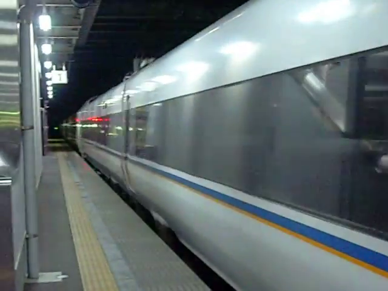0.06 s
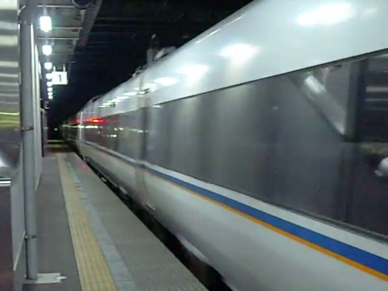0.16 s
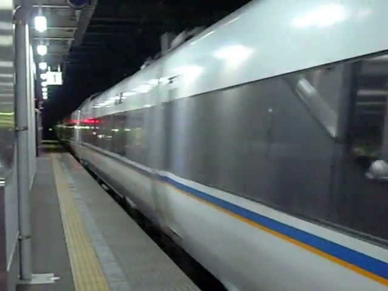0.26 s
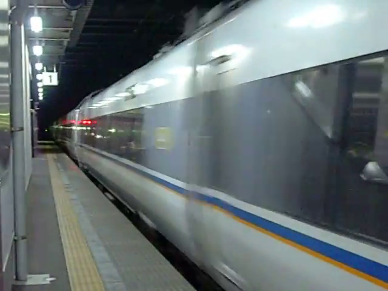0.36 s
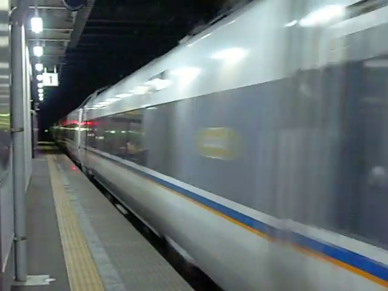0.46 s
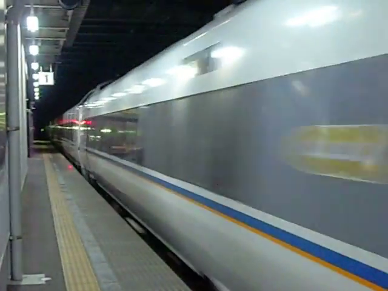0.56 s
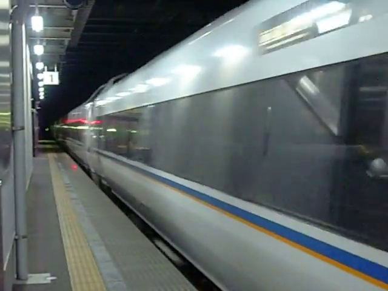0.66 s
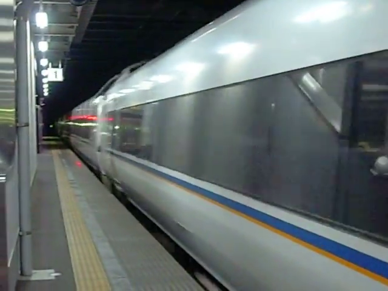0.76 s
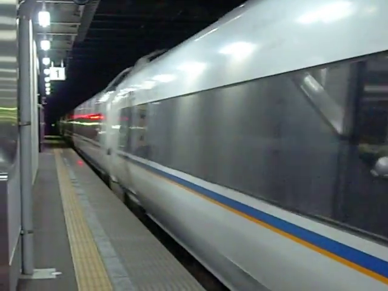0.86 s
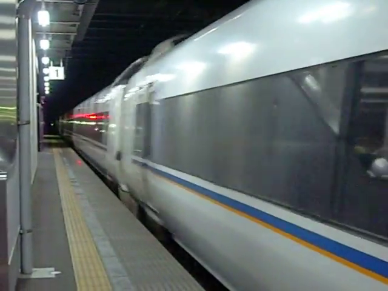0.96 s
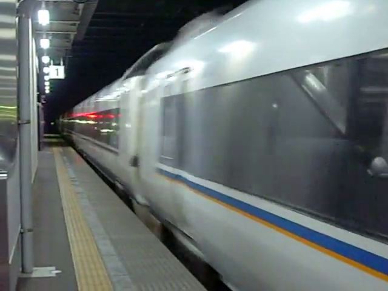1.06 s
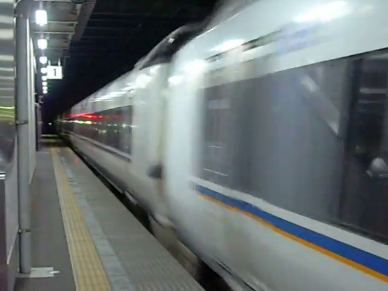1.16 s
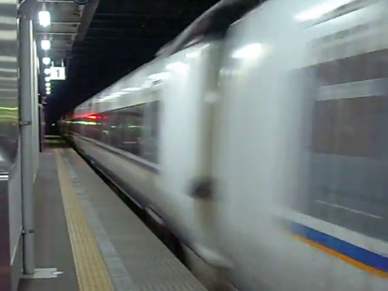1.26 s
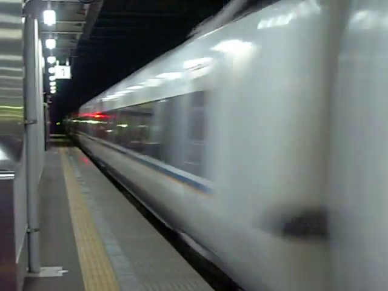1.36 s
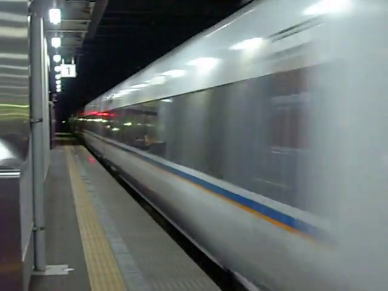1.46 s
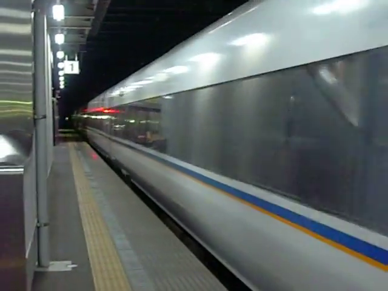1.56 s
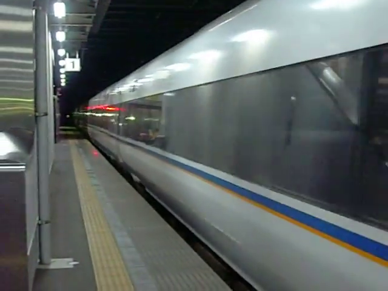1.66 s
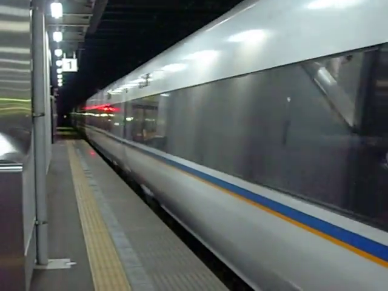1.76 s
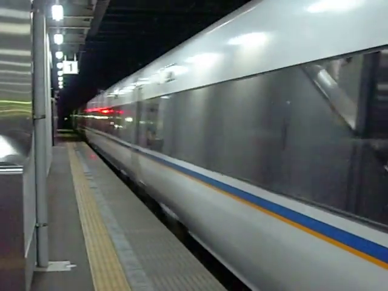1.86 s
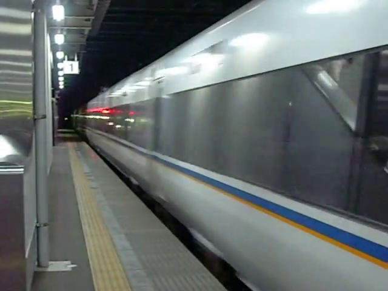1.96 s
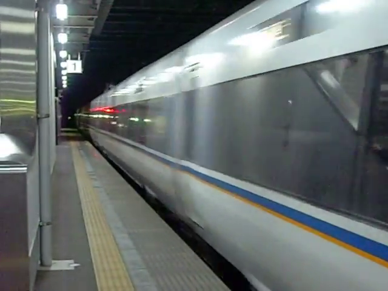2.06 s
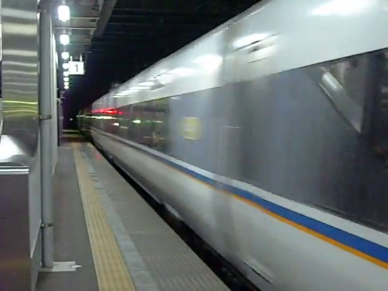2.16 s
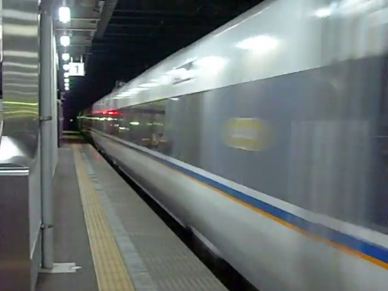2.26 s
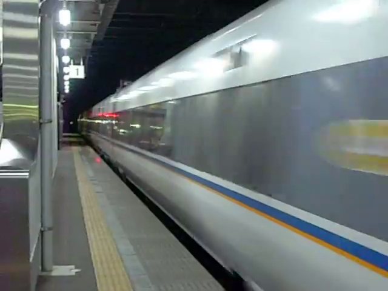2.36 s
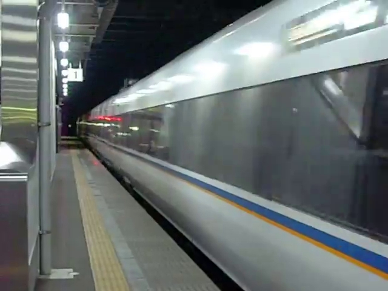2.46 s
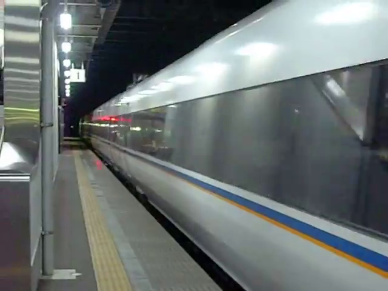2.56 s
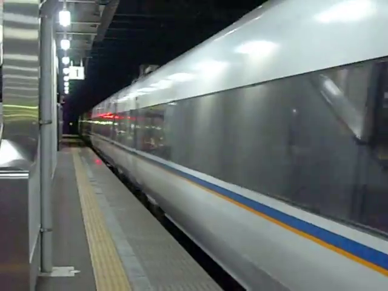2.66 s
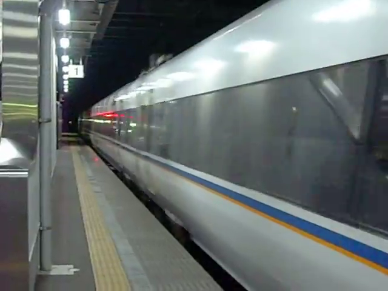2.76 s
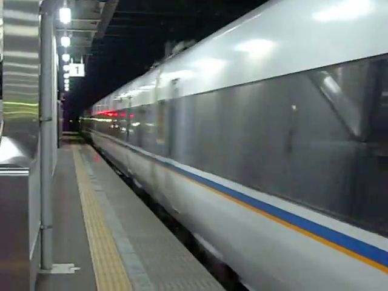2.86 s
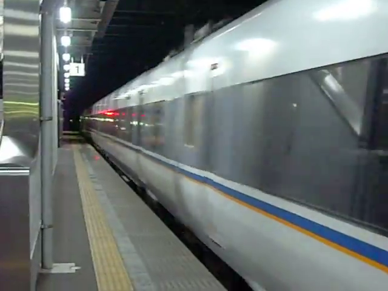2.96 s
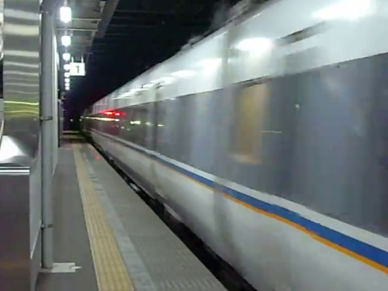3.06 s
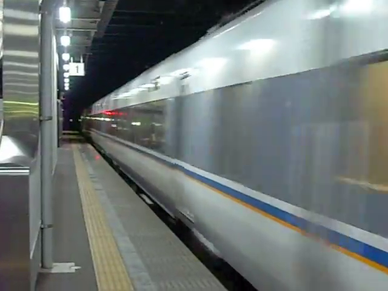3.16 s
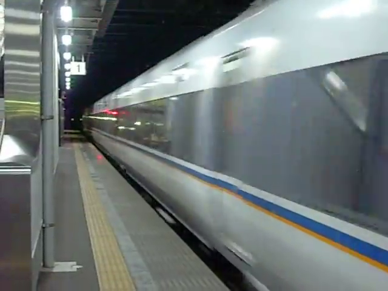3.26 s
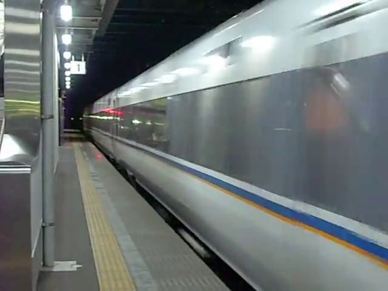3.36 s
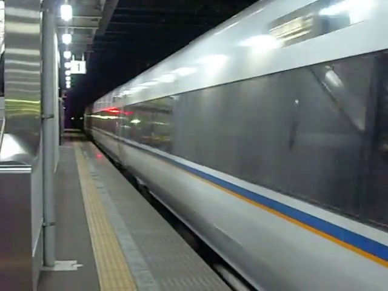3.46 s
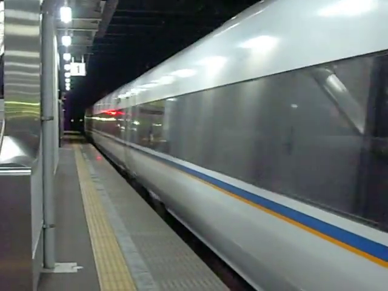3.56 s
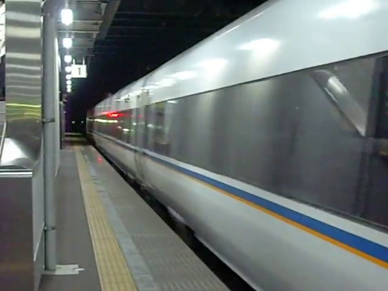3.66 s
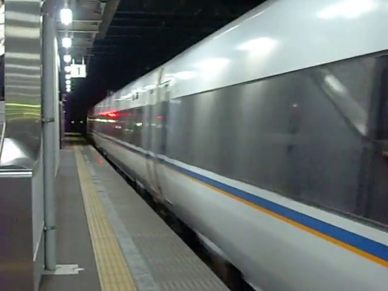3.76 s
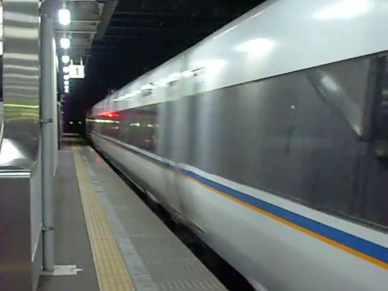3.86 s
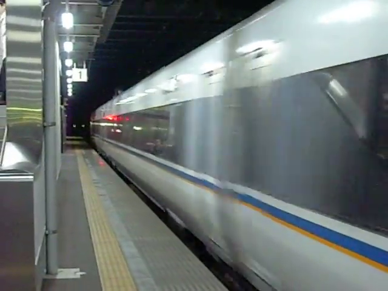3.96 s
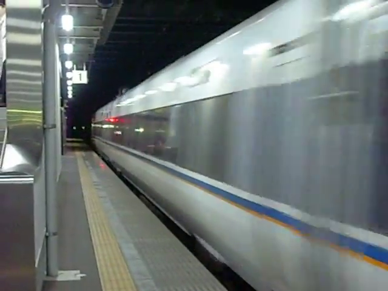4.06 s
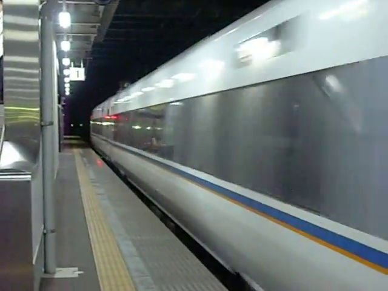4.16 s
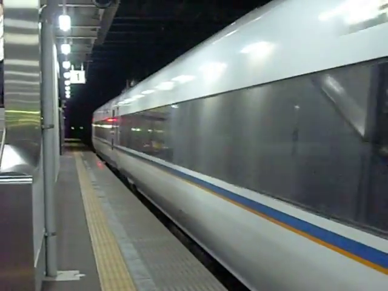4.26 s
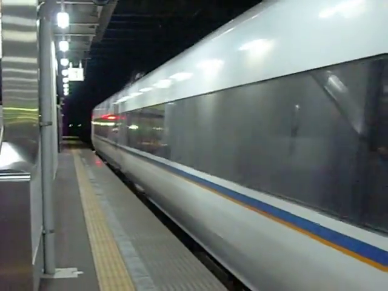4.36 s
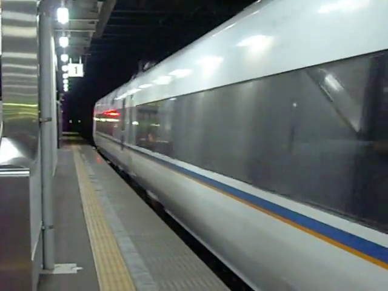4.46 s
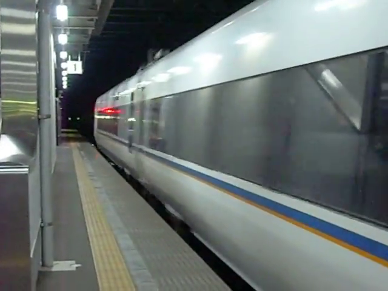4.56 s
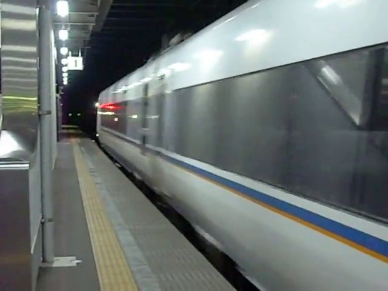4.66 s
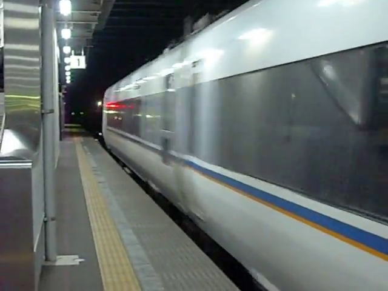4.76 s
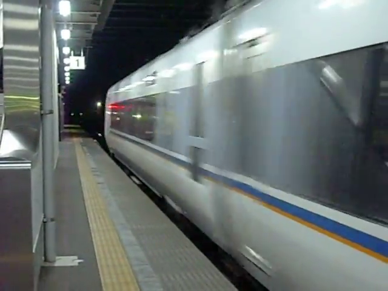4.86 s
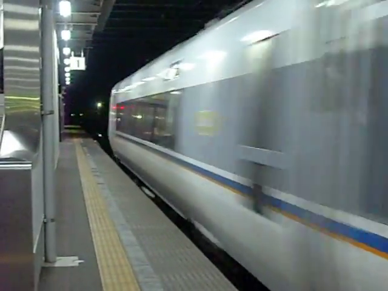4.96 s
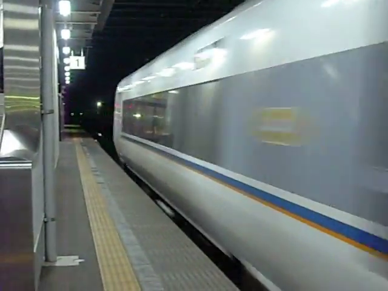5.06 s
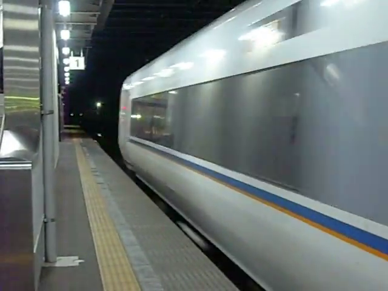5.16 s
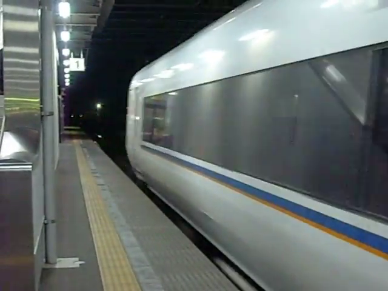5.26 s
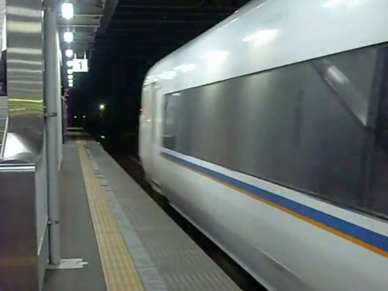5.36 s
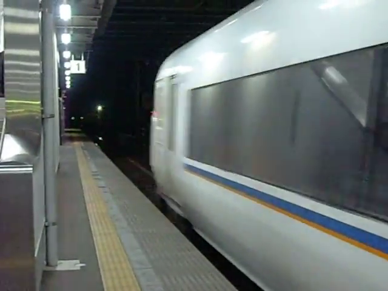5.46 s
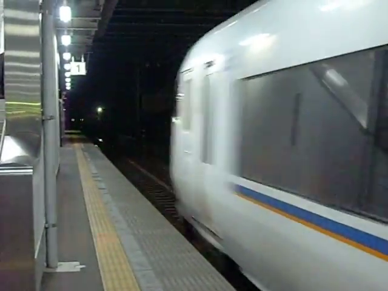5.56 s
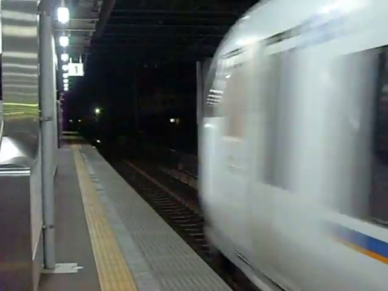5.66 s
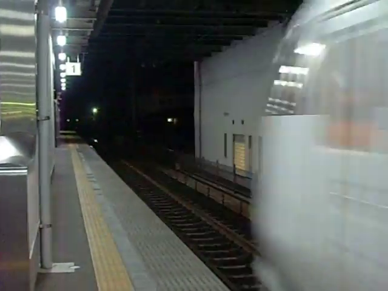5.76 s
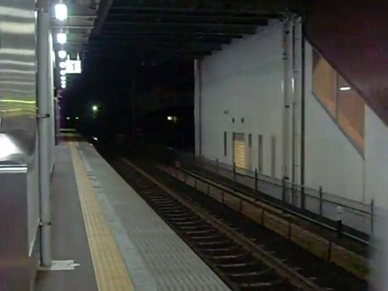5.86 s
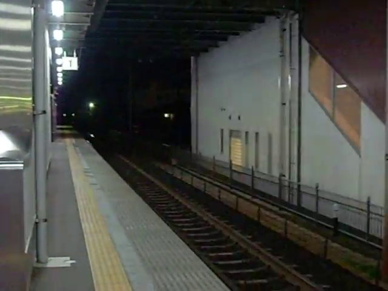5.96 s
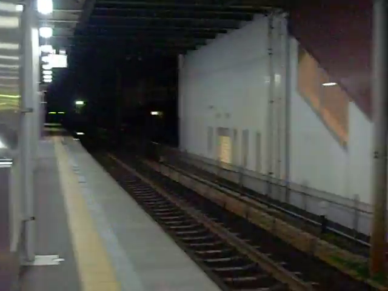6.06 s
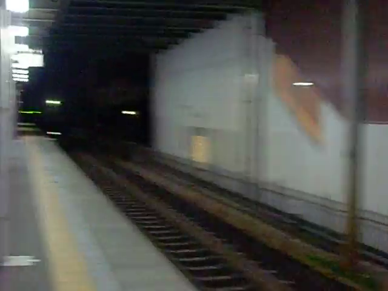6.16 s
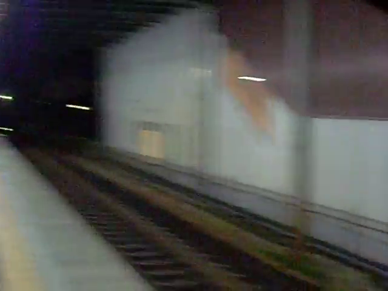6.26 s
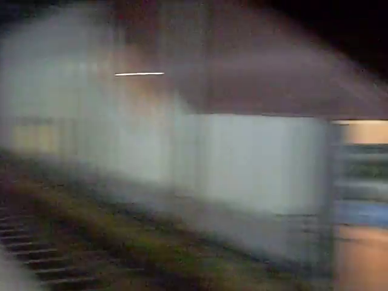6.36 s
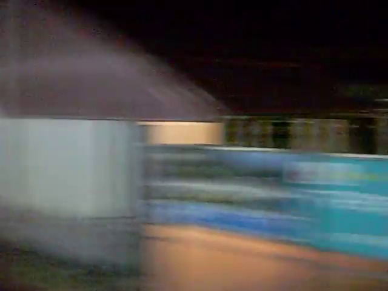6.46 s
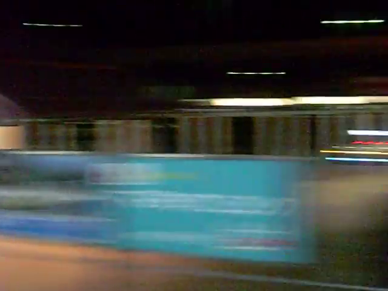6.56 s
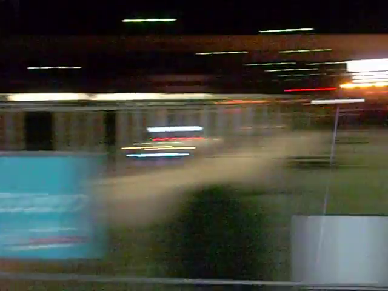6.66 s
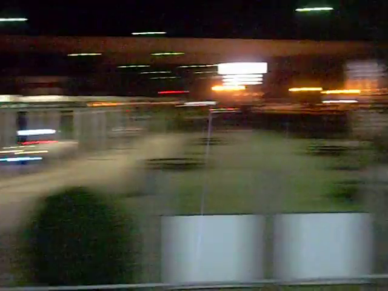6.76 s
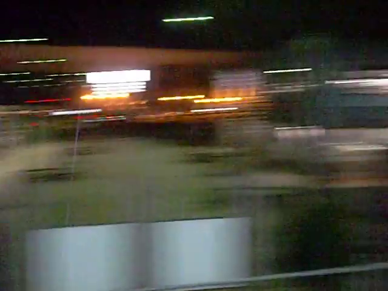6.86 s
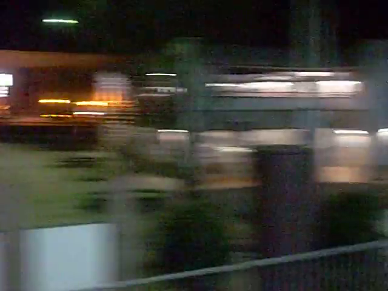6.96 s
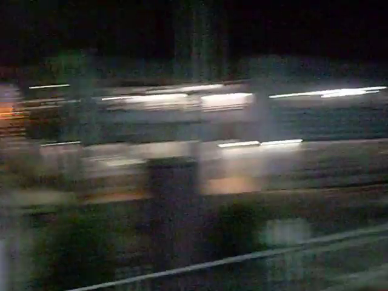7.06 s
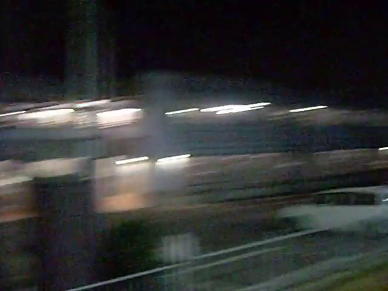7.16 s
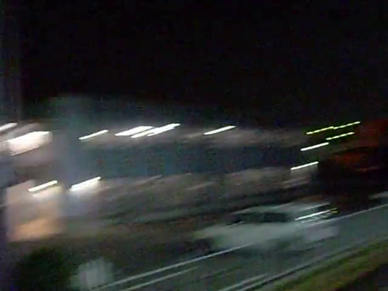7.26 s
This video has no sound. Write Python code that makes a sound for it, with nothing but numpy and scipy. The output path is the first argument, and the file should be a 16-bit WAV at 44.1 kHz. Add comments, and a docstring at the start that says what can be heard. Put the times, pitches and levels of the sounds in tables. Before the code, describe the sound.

An electric train roars past very close at speed, wheels ringing and hissing, then its wake buffets the microphone in hard gusts.

```python
"""Wheels roar on the rail as an electric train runs through a station at speed, an arm's length from
the microphone on the platform. The steel rings and hisses, swelling with each bogie, and some wheels
sing, falling in pitch as they pass. The slipstream flutters on the microphone; behind the last car
the wake strikes in hard gusts that overload the recorder, while the train recedes."""
import sys
import numpy as np
from scipy import signal
from scipy.fft import rfft, irfft, next_fast_len
from scipy.io import wavfile
from scipy.ndimage import uniform_filter1d, map_coordinates

SR = 44100
rng = np.random.default_rng(int(sys.argv[2]) if len(sys.argv) > 2 else 0)


def dump(signal):
    """Clip the signal to [-1, 1] and save it as 16-bit WAV at the path in sys.argv[1]."""
    limited = np.clip(np.atleast_2d(signal).T, -1, 1)
    pcm = np.round(limited * 32767).astype(np.int16)
    wavfile.write(sys.argv[1], SR, pcm)


N = 321930
TIME_S = np.arange(N) / SR


def amp(db):
    """Decibels to gain."""
    return 10 ** (np.asarray(db) / 20)


def unit(x):
    """Scale to rms 1."""
    return x / np.sqrt(np.mean(x ** 2) + 1e-20)


def shape(points):
    """Gain as a function of frequency, from (freq_hz, level_db) points on a log axis."""
    freq_hz, db = np.transpose(points)
    return lambda hz: amp(np.interp(np.log(hz + 1), np.log(freq_hz + 1), db))


def resonances(modes):
    """Gain as a function of frequency, from overlapping (centre_hz, width_hz, level_db) resonances."""
    return lambda hz: np.sqrt(sum(amp(db) ** 2 / (1 + ((hz - centre) / width) ** 2 / 2) ** 4
                                  for centre, width, db in modes))


def wobble(rate_hz):
    """A smooth random curve with rate_hz knots a second."""
    return map_coordinates(rng.standard_normal(N // 20), [TIME_S * rate_hz], mode="wrap")


def filtered(x, response):
    """Filter x by a gain given as a function of frequency."""
    size = next_fast_len(len(x) + 8192)
    return irfft(rfft(x, size) * response(np.fft.rfftfreq(size, 1 / SR)), size)[:len(x)]


def rush(response, patchy_db):
    """Coloured noise of rms 1 with patches of random gain in time and frequency."""
    spectra = signal.stft(rng.standard_normal(N), nperseg=512)[2]
    patches = uniform_filter1d(rng.standard_normal(spectra.shape), size=4, axis=0)
    patches = uniform_filter1d(patches, size=14, axis=1)
    noise = signal.istft(spectra * amp(patchy_db * unit(patches)))[1][:N]
    return unit(filtered(noise, response))


def swell(nearest_s, rise_s, fall_ratio=0.61):
    """Power of a source passing the microphone: 1 when nearest, falling faster than it rose."""
    t = TIME_S - nearest_s
    return np.exp(-(t / np.where(t < 0, rise_s, fall_ratio * rise_s)) ** 2)


# Bogies passing at arm's length: nearest_s, roar_db, ring_db, hiss_db, draught_db
BOGIES = [(-0.1, -29, -28, -28.5, -27.5), (0.38, -25.5, -34.5, -29, -35.5), (0.74, -26, -31, -24.5, -31),
          (1.38, -28, -35.5, -28.5, -46), (1.62, -23.5, -32, -29.5, -44), (2.29, -24, -37.5, -26, -30.5),
          (2.6, -27, -32, -26.5, -48), (3.11, -25, -30, -26, -30), (3.44, -25, -29, -26, -27.5),
          (4.041, -26, -38.5, -28.5, -30.5), (4.3, -23, -33, -29.5, -33.5), (4.95, -25, -37, -29, -25.5),
          (5.23, -28, -30.5, -26, -30.5), (5.889, -27, -35.5, -29.5, -47)]
def passing(layer, rise_s, rest_db, fade_db_per_s, last_car_s=5.8):
    """Gain of one layer: a swell per bogie over the rest of the train, which fades after the last car."""
    column = 1 + ["roar", "ring", "hiss", "draught"].index(layer)
    near_power = sum(amp(bogie[column]) ** 2 * swell(bogie[0], rise_s) for bogie in BOGIES)
    gone_s = np.maximum(TIME_S - last_car_s, 0)
    return np.sqrt(near_power + amp(rest_db - fade_db_per_s * gone_s) ** 2)


# Spectrum of the wind on the microphone: freq_hz, level_db
WIND_SPECTRUM = [(8, 1.5), (25, -0.5), (45, -6), (80, -5), (160, -6), (350, -8.5), (700, -16),
                 (1400, -26.5), (4000, -55.5)]
# Buffeting on the platform behind the last car: time_s, level_db
WAKE = [(6.05, -41), (6.184, -28), (6.286, -25), (6.564, -20), (7.006, -44), (7.048, -32), (7.146, -37.5),
        (7.174, -52), (7.3, -16.5)]
def slipstream(wake_rise_s=0.12):
    """Turbulent air rumbles on the microphone in quick lumps: a draught from each bogie, then the wake."""
    draught = passing("draught", rise_s=0.29, rest_db=-38, fade_db_per_s=11)
    wake_s, wake_db = np.transpose(WAKE)
    arrived = np.clip((TIME_S - wake_s[0]) / wake_rise_s + 1, 0, 1)
    wake = arrived * amp(np.interp(TIME_S, wake_s, wake_db))
    lumps = amp(3.2 * wobble(rate_hz=30) + 1.4 * wobble(rate_hz=110))
    return np.hypot(draught, wake) * unit(lumps * rush(shape(WIND_SPECTRUM), patchy_db=2.24))


# Eddies striking the microphone: middle_s, length_s, level_db (before trim), edge_hz (before ratio)
EDDIES = [(0.043, 0.0075, -18.5, 585), (0.516, 0.029, -24, 634), (0.635, 0.021, -28, 800),
          (1.062, 0.074, -29, 410), (3.051, 0.017, -23, 600), (3.365, 0.011, -17.5, 924),
          (3.411, 0.031, -22.5, 770), (3.697, 0.043, -23, 438), (4.213, 0.018, -18, 600),
          (4.357, 0.048, -24, 763), (4.72, 0.028, -24, 690), (4.928, 0.0066, -14.5, 880),
          (4.988, 0.015, -22, 800), (5.043, 0.012, -17.5, 483), (5.171, 0.012, -19, 650),
          (6.155, 0.054, -19.5, 342), (6.171, 0.011, -13, 1150), (6.193, 0.013, -14.5, 810),
          (6.217, 0.0078, -17, 520), (6.263, 0.009, -14.5, 870), (6.276, 0.024, -16.5, 670),
          (6.342, 0.038, -25.5, 830), (6.403, 0.04, -22.5, 796), (6.454, 0.025, -12, 1200),
          (6.49, 0.021, -10.5, 1785), (6.528, 0.012, -6, 1100), (6.614, 0.012, -13, 686),
          (6.662, 0.013, -15, 780), (6.691, 0.031, -24, 490), (7.06, 0.029, -26, 410),
          (7.083, 0.019, -20.5, 790), (7.122, 0.046, -27, 600), (7.277, 0.0095, -16.5, 860),
          (7.294, 0.01, -21, 487)]
def gusts(edge_ratio=1.114, steepness=3.46, sharpness=3.05, ragged_db=2.5, trim_db=-0.4):
    """Each eddy is a short, ragged burst of pressure noise; fast, small eddies reach higher in pitch."""
    out = np.zeros(N + SR)
    t = np.arange(-SR // 8, SR // 8) / SR
    flutter = amp(ragged_db * np.pad(wobble(rate_hz=840), (0, SR)))
    for middle_s, length_s, level_db, edge_hz in EDDIES:
        def colour(hz):
            bass_shelf = 0.19 + hz / (hz + 500)
            return bass_shelf / np.hypot(1, (hz / (edge_ratio * edge_hz)) ** steepness)

        start = round(middle_s * SR)
        here = slice(start, start + len(t))
        envelope = flutter[here] / np.cosh(sharpness * t / length_s)
        eddy = envelope * filtered(rng.standard_normal(len(t)), colour)
        eddy /= np.sqrt(np.sum(eddy ** 2) / (length_s * SR))  # rms 1 over its length
        out[here] += amp(level_db + trim_db) * eddy
    return out[SR // 8:][:N]  # centres each burst on its middle_s


# Tight vortex cores crossing the microphone's port: middle_s, suction_db
VORTEX_CORES = [(0.644, -2), (5.028, -2), (6.619, 0.5)]
def vortex_pops(half_dip_s=0.00032):
    """A vortex core pops sharply: one brief dip in pressure between two small rises."""
    out = np.zeros(N)
    for middle_s, suction_db in VORTEX_CORES:
        offset = (TIME_S - middle_s) / half_dip_s
        out -= amp(suction_db) * (1 - offset ** 2) * np.exp(-offset ** 2 / 2)
    return out


# Modes of a steel wheel: pitch_ratio, width_hz, level_db
WHEEL_MODES = [(1, 88, 1.5), (1.4, 115.7, -3), (2.001, 150.7, -13)]
# Wheels that sing along the platform edge: nearest_s, rest_pitch_hz, level_db, rise_s
SINGING_WHEELS = [(0.75, 1485, -31, 0.49), (1.4, 1490, -33, .2), (2.58, 1497, -31, .25),
                  (3.25, 1500, -30.5, 0.37), (3.98, 1520, -35.5, 0.43), (5.27, 1475, -33, .25),
                  (5.88, 1423, -33.5, .35)]
def singing_wheels(mach=0.066, glide_s=0.45, far_db=-12, fade_db_per_s=4.5):
    """Each wheel rings in narrow bands, sharp while it approaches and flat as it draws away."""
    out = np.zeros(N)
    for nearest_s, rest_pitch_hz, level_db, rise_s in SINGING_WHEELS:
        t = TIME_S - nearest_s
        modes = [(ratio * rest_pitch_hz, width_hz, db) for ratio, width_hz, db in WHEEL_MODES]
        ring = rush(resonances(modes), patchy_db=1)
        doppler = 1 / (1 + mach * t / np.hypot(t, glide_s))
        gliding = map_coordinates(ring, [np.cumsum(doppler)], mode="wrap")
        far = (t > 0) * amp(far_db - fade_db_per_s * np.abs(t))  # still heard down the track
        out += amp(level_db) * np.sqrt(swell(nearest_s, rise_s) + far ** 2) * gliding
    return out


# Spectrum of the hiss at the platform edge: freq_hz, level_db
HISS_SPECTRUM = [(800, -10.5), (1750, 1.5), (2300, -7), (2650, 2.5), (3400, 1.5), (4400, 0), (5000, -1),
                 (6500, -5)]
def rail_hiss(judder, grit):
    """Rushing air and fine rail roughness make a grainy hiss."""
    gain = passing("hiss", rise_s=0.23, rest_db=-34.5, fade_db_per_s=3.5)
    return gain * amp(0.12 * judder + 1.4 * grit) * rush(shape(HISS_SPECTRUM), patchy_db=0.27)


# Broad ringing modes of the rolling wheels: centre_hz, width_hz, level_db
WHEEL_RING_MODES = [(2044, 200, 0.5), (2888, 300, -2), (3040, 380, -12.5), (3900, 260, -5), (4800, 230, -7)]
def wheel_ring(judder):
    """The rolling wheels ring in broad steel resonances."""
    gain = passing("ring", rise_s=0.21, rest_db=-37.5, fade_db_per_s=5)
    return gain * amp(0.21 * judder) * rush(resonances(WHEEL_RING_MODES), patchy_db=1.5)


# Spectrum of wheels rolling on rail, close up: freq_hz, level_db
ROAR_SPECTRUM = [(20, -21.5), (200, -13.5), (285, -5.5), (330, -5), (365, -3.5), (410, -5.5), (600, -4),
                 (745, -1), (880, -3.5), (1130, -5.5), (1320, -9), (1720, -16), (2500, -14), (5000, -22.5)]
def rolling_roar(judder):
    """The contact of wheel and rail roars, loudest as a bogie goes by."""
    gain = passing("roar", rise_s=0.32, rest_db=-31.5, fade_db_per_s=4)
    return gain * amp(0.7 * judder) * rush(shape(ROAR_SPECTRUM), patchy_db=1)


def scene():
    """The train and its wind at one microphone on the platform."""
    judder = wobble(rate_hz=45)  # uneven treads shake roar, ring and hiss together
    grit = wobble(rate_hz=300)  # fine roughness of the running surfaces
    train = rolling_roar(judder) + wheel_ring(judder) + rail_hiss(judder, grit) + singing_wheels()
    return (train + slipstream() + gusts() + vortex_pops())[None]


# The microphone's treble roll-off: freq_hz, gain_db
MICROPHONE = [(5000, 0.5), (5300, -3), (5600, -11), (5900, -15.5), (6200, -32), (6600, -70)]
def record(dry, ceiling=0.71, top_hz=15800):
    """A dull microphone; the hardest gusts clip in the recorder behind it."""
    dull = filtered(dry[0], shape(MICROPHONE))
    clipped = np.clip(dull, -ceiling, ceiling)
    return filtered(clipped, lambda hz: hz < top_hz)[None]


dry = scene()
out = record(dry)
dump(out)
```